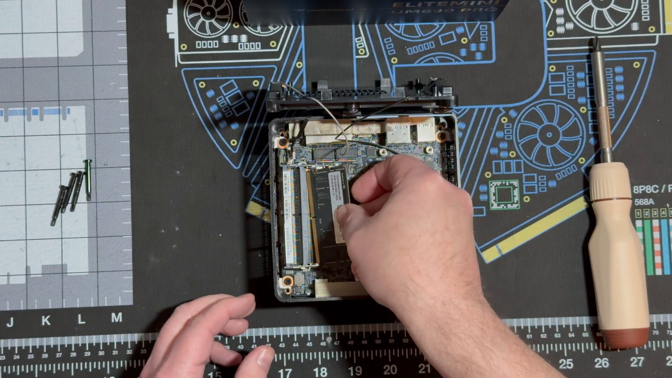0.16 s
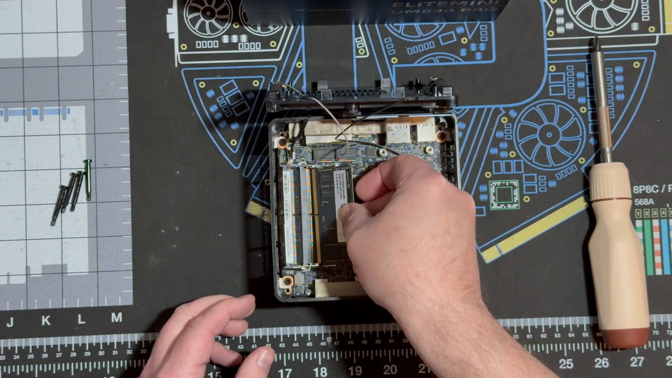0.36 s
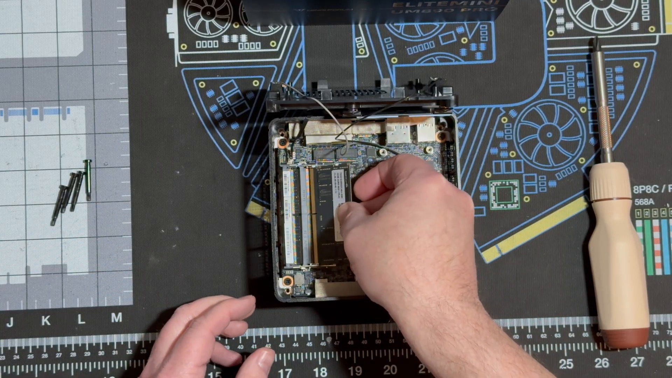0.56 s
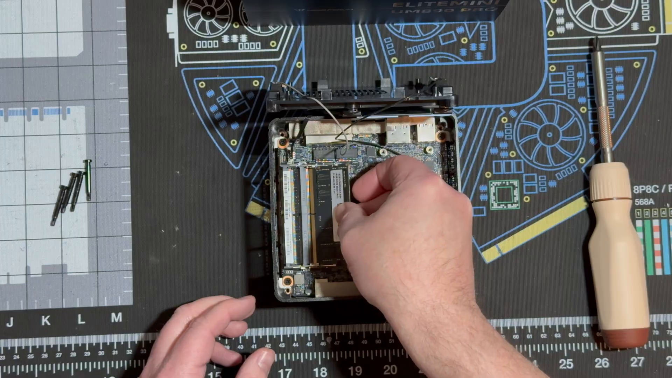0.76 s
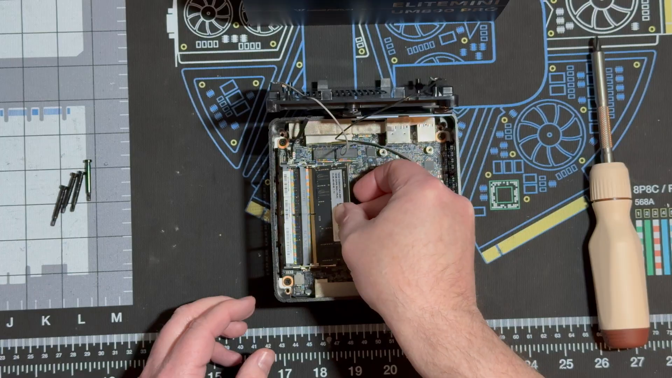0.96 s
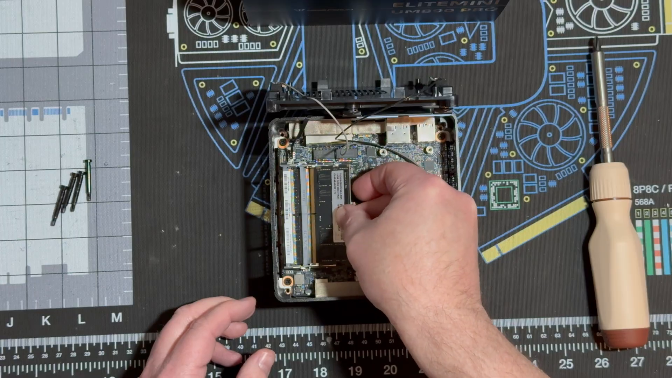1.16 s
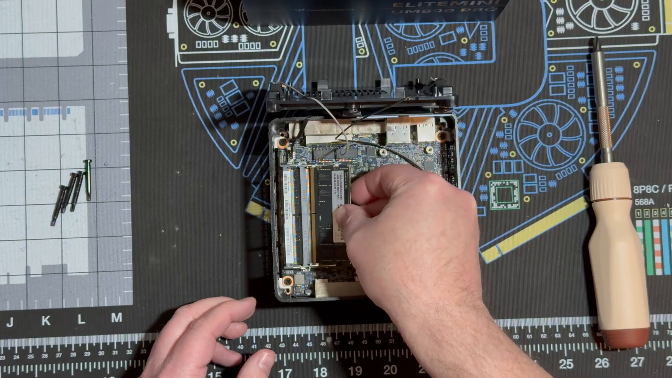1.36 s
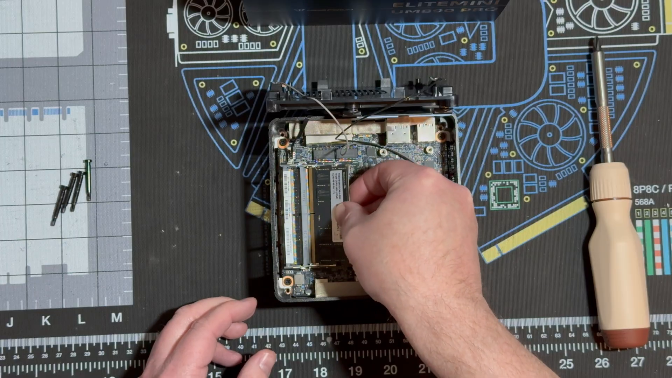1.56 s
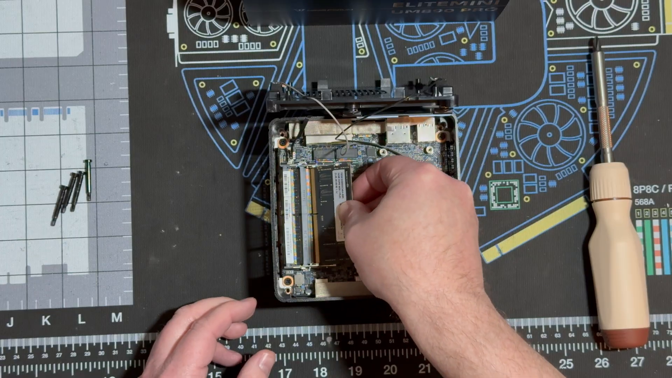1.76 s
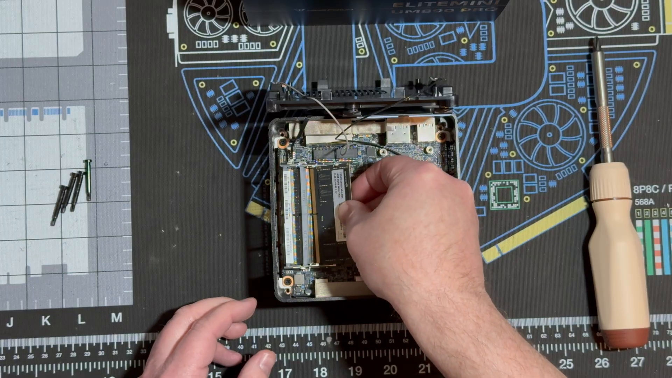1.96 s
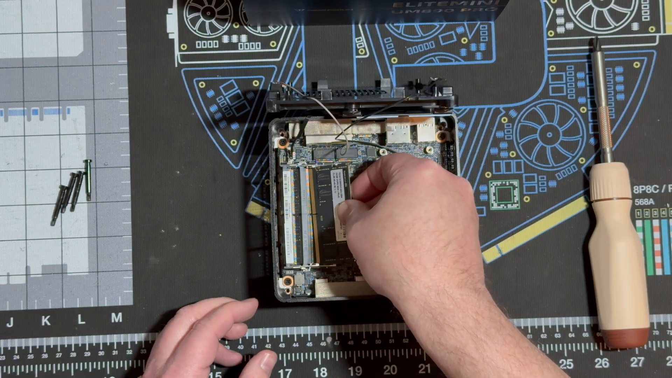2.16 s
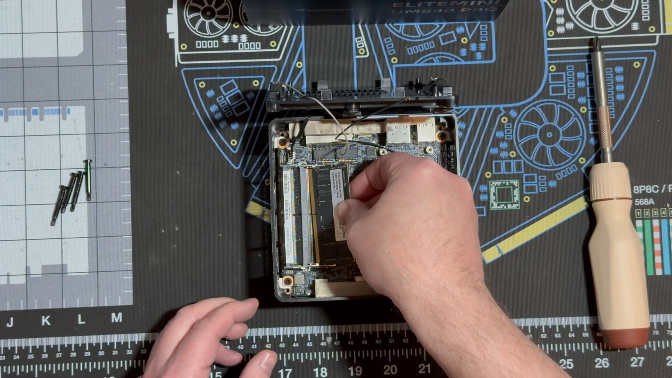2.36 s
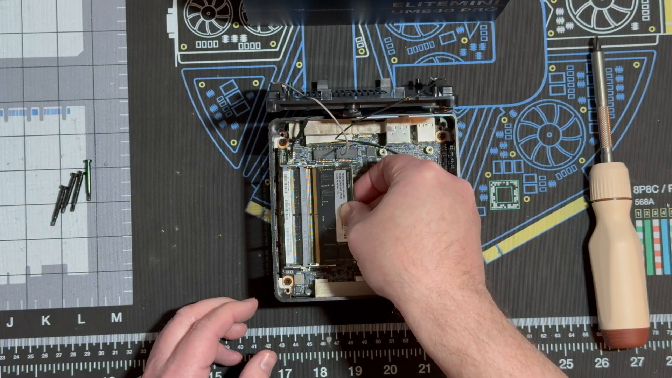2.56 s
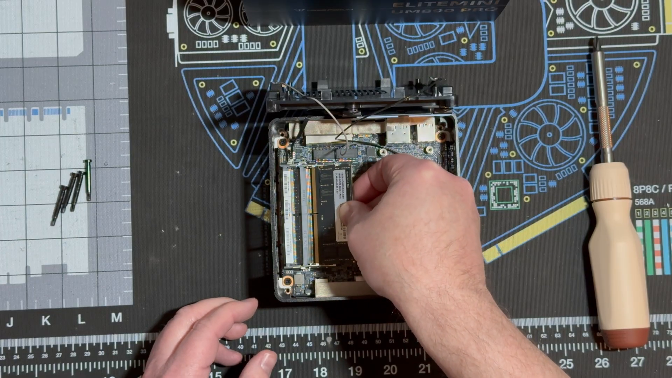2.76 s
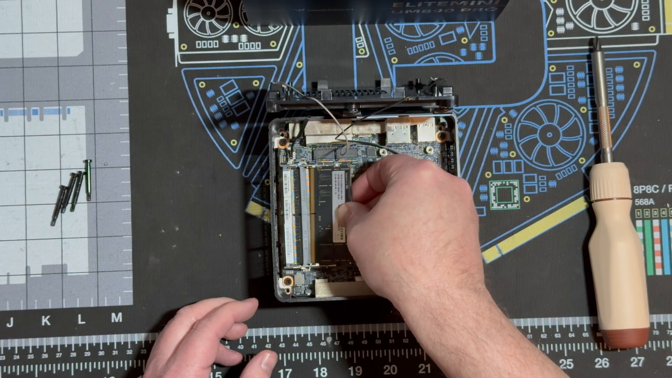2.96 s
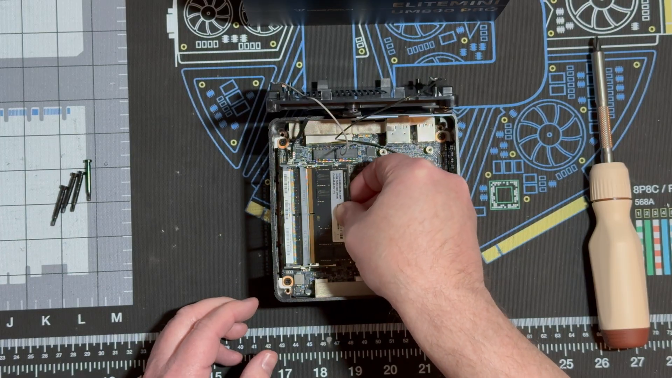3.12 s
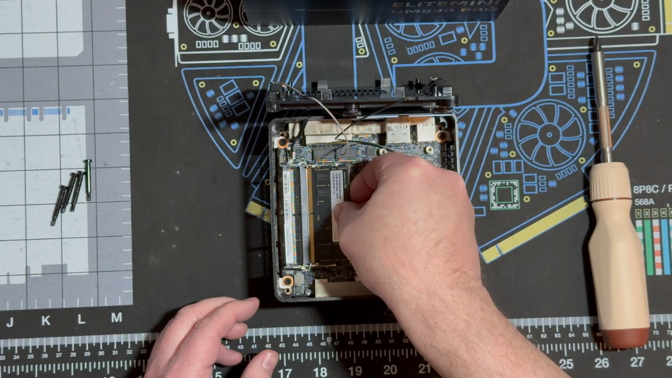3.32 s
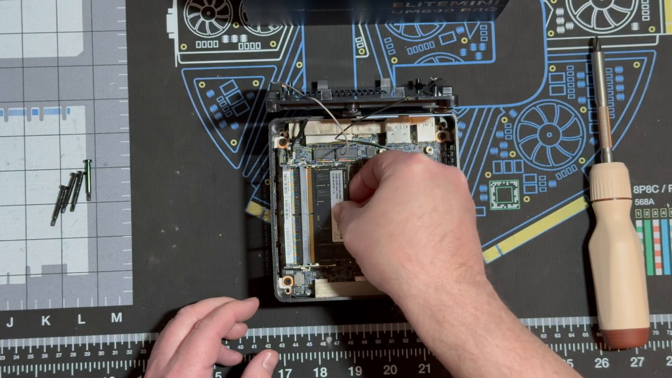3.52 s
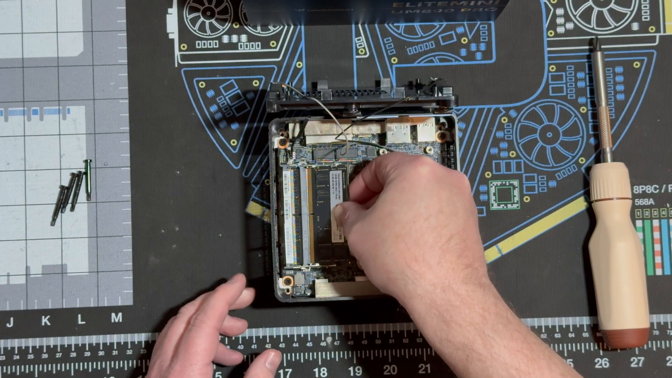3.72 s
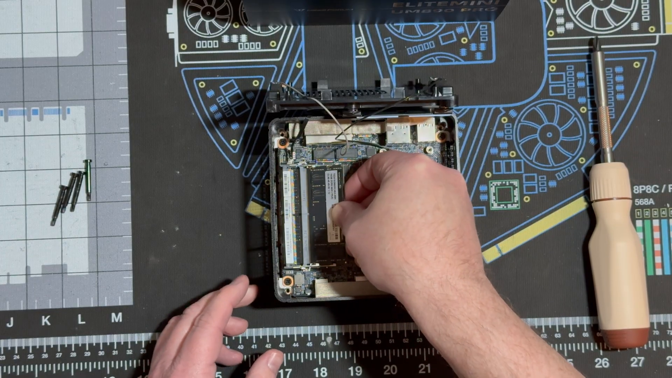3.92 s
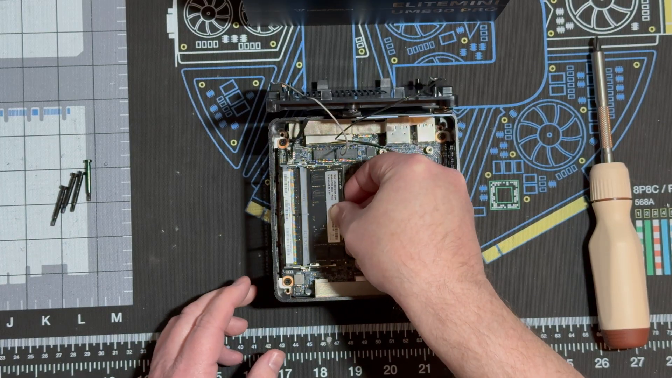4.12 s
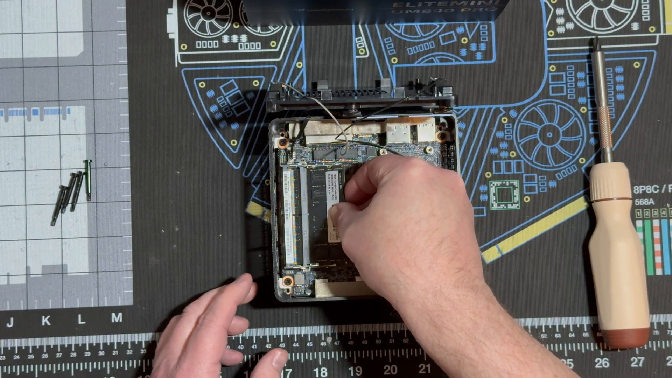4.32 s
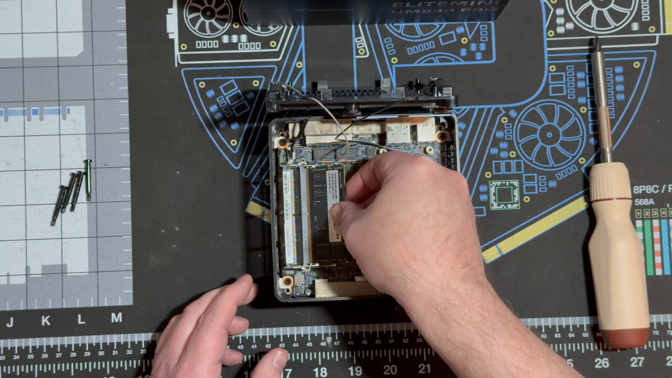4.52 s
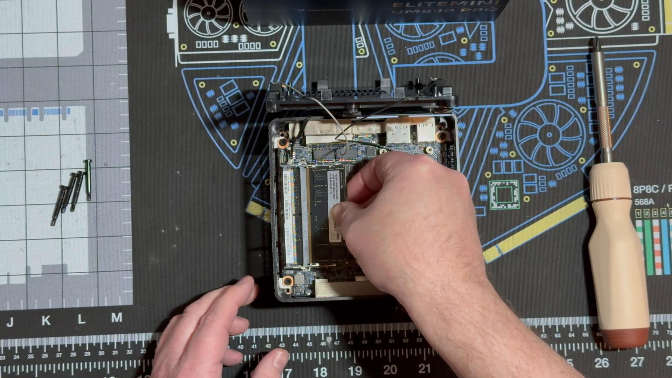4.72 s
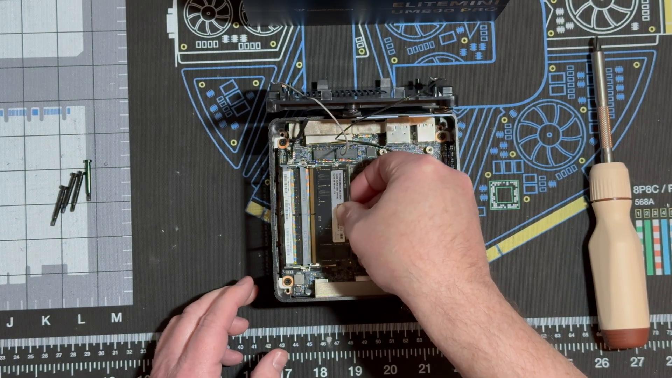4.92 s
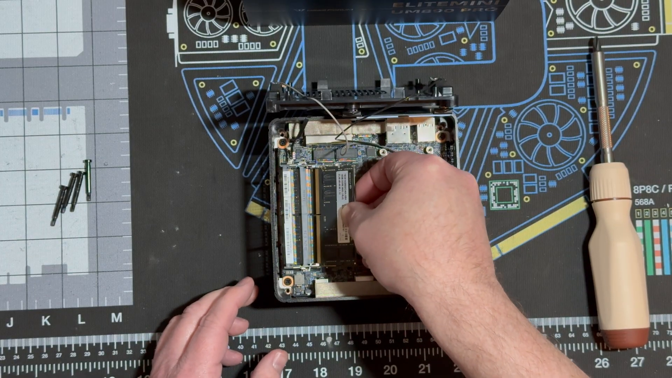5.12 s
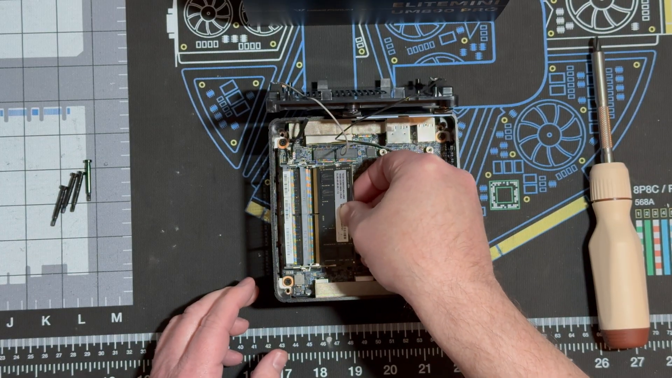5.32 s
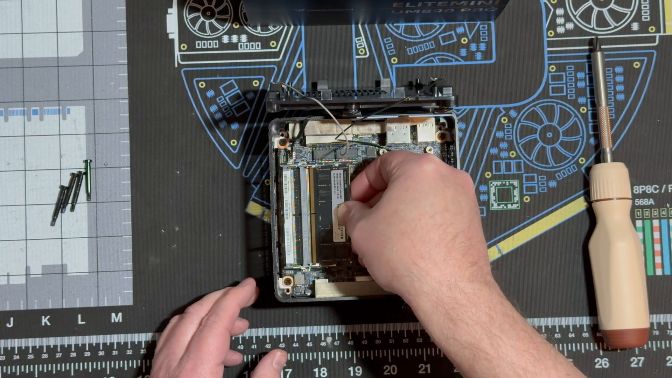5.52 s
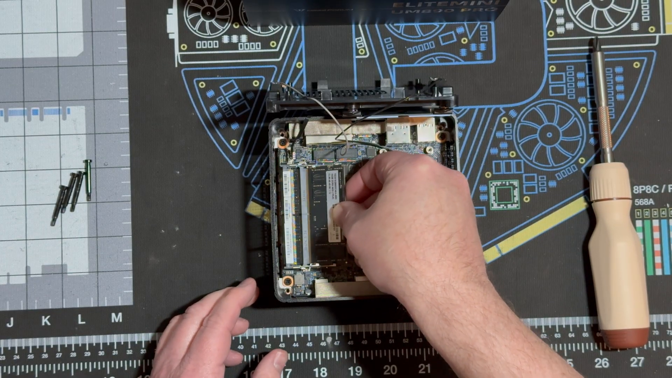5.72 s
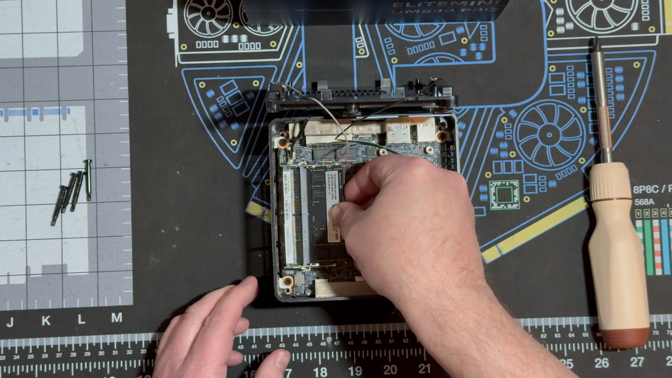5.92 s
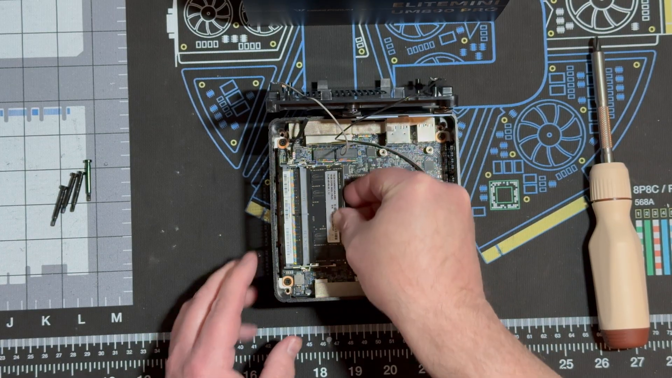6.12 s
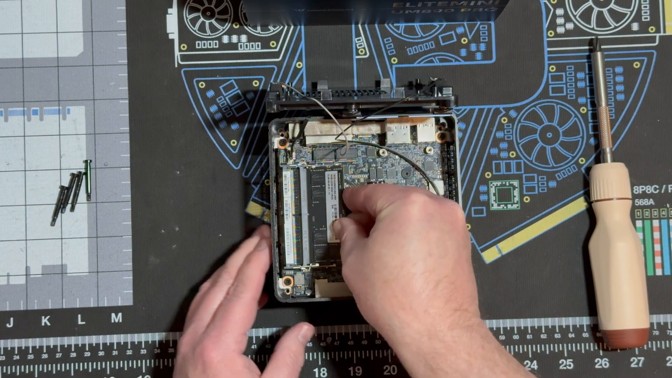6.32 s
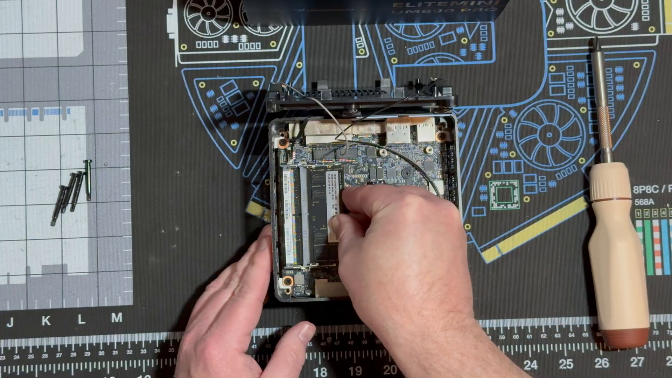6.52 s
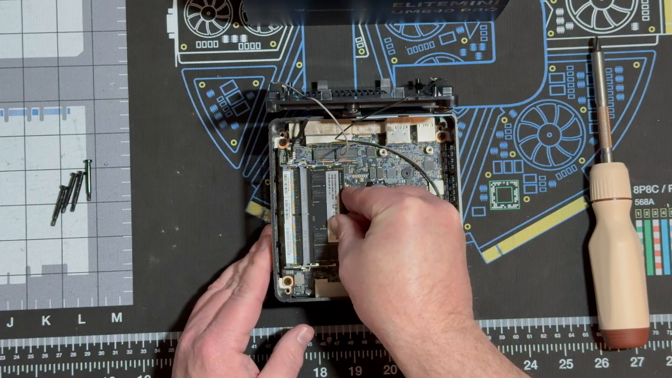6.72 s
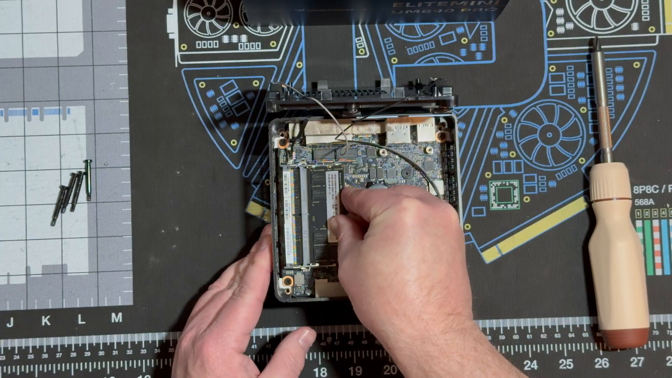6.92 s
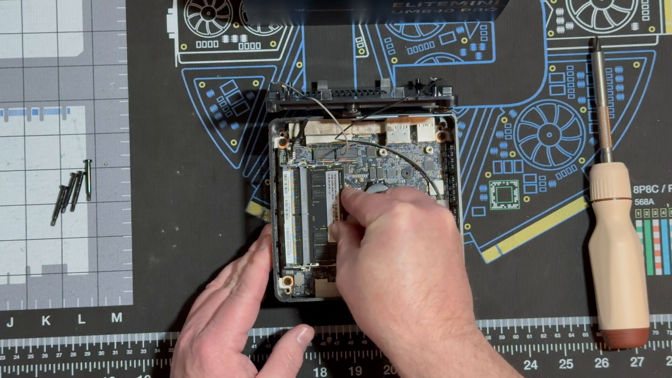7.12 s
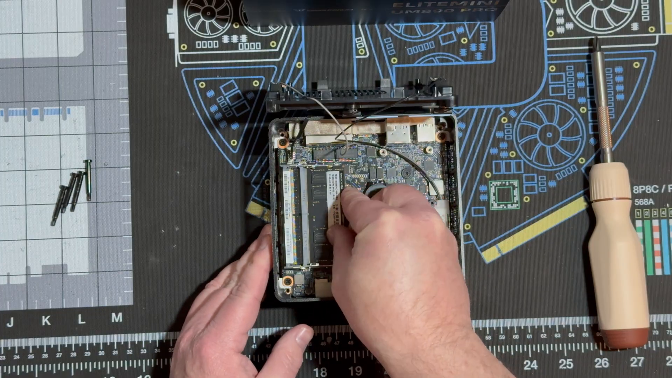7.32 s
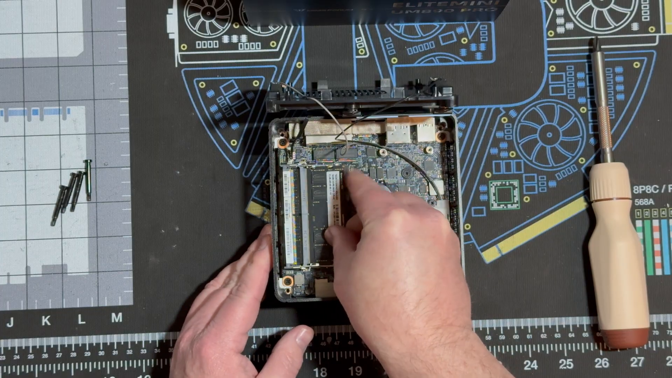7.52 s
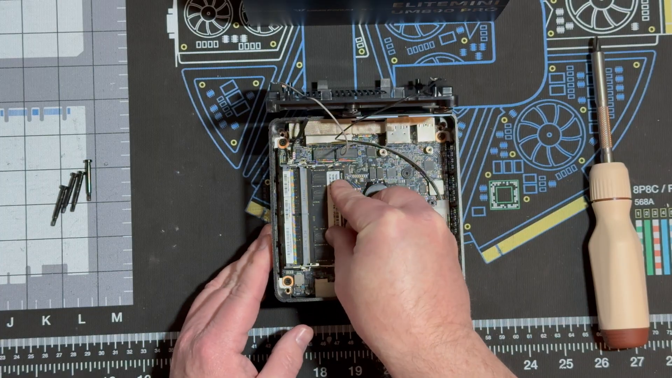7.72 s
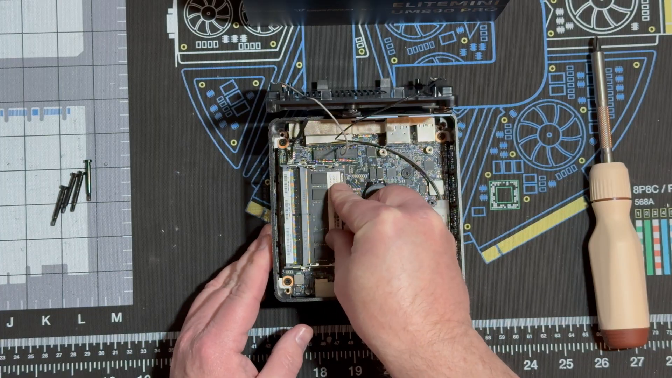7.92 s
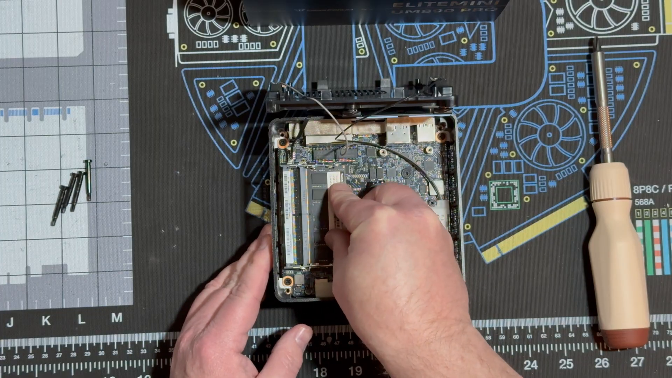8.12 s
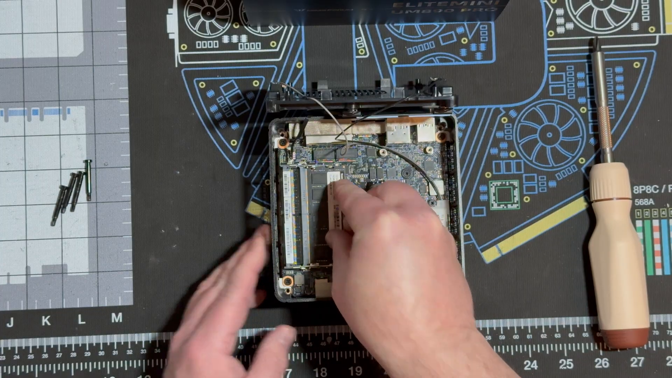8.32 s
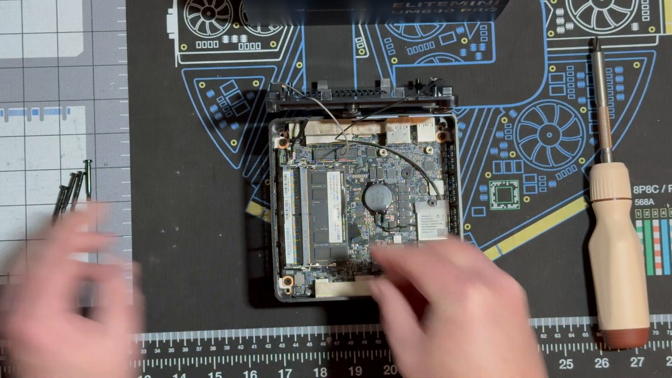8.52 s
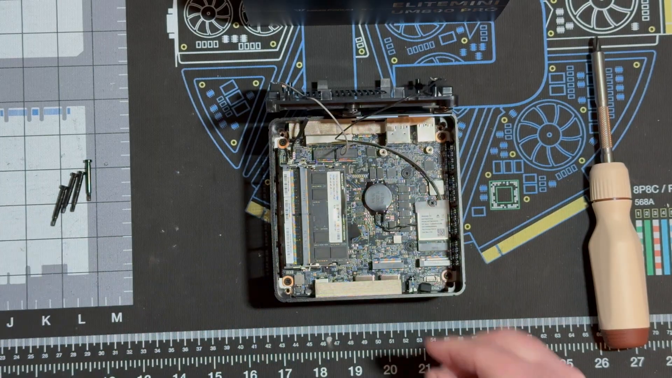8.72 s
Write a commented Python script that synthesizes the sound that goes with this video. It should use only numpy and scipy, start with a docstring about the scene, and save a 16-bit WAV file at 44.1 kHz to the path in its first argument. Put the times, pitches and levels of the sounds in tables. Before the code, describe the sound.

Close up on a desk in a quiet room, a memory module taps, ticks and scrapes against a computer slot in uneven little clusters. Soft low bumps carry through the desk to the microphone as it is pushed. After several seconds of fiddling it snaps home with a crisp crack, the loudest sound, and the metal clips ring briefly before a few last light clicks.

```python
"""A memory module taps and scrapes its way into the socket of a small computer board, then snaps home.
Each contact rings the board's resonances; metal contacts tick and the spring clips ring on.
The board lies on a desk mat, close under the microphone of a camera on an arm: taps thud through
the desk, and pushes set the arm swaying at a few very low tones.
Farther off, the walls answer briefly and the room hums quietly."""
import sys
import numpy as np
from scipy import signal
from scipy.fft import rfft, irfft, next_fast_len
from scipy.io import wavfile
from scipy.ndimage import map_coordinates

SR = 44100
rng = np.random.default_rng(int(sys.argv[2]) if len(sys.argv) > 2 else 0)


def generate_wav(signal):
    """Clip the signal to [-1, 1] and save it as 16-bit WAV at the path in sys.argv[1]."""
    frames = np.transpose(np.atleast_2d(signal))
    scaled = np.clip(frames, -1, 1) * 32767
    pcm = np.round(scaled).astype(np.int16)
    wavfile.write(sys.argv[1], SR, pcm)


N = 386757
FREQS = np.fft.rfftfreq(8192, 1 / SR)  # Hz, the grid for resonance curves


def amp(db):
    return 10 ** (np.asarray(db) / 20)


def unit_rms(x):
    return x / np.sqrt(np.mean(x ** 2) + 1e-20)


def along(points, hz):
    """Interpolates (Hz, value) points on a log frequency axis."""
    f, values = np.transpose(points)
    return np.interp(np.log(hz + 1), np.log(f + 1), values)


def curves(rows):
    """One value per sample for each column after the time."""
    times, *columns = np.transpose(rows)
    return [np.interp(np.arange(N) / SR, times, column) for column in columns]


def wobble(rate):
    """A smooth random curve, rate knots a second."""
    return map_coordinates(rng.standard_normal(int(N * rate / SR) + 4), [np.arange(N) * rate / SR])


def wavering(hz, waver_hz):
    """A tone of rms 1 whose pitch drifts."""
    phase = 2 * np.pi * np.cumsum(hz + waver_hz * wobble(2.5)) / SR
    return np.sqrt(2) * np.sin(phase + rng.uniform(0, 2 * np.pi))


def filtered(x, response):
    """Shapes x by a gain given as a function of frequency."""
    size = next_fast_len(N + SR // 2)
    return irfft(rfft(x, size) * response(np.fft.rfftfreq(size, 1 / SR)), size)[..., :N]


def add(track, start, sound):
    """Mixes a sound into the track at start seconds."""
    part = track[round(start * SR):][:len(sound)]
    part += sound[:len(part)]


def peaks(modes, f):
    """Magnitude of resonances (Hz, width in Hz, dB) added in power."""
    centre, width, db = np.transpose(modes)[:, :, None]
    power = amp(2 * db) * (f * width) ** 2 / ((centre ** 2 - f ** 2) ** 2 + (f * width) ** 2)
    return np.sqrt(power.sum(axis=0))


def contact(gain, rise, t60, ragged_db, blow=0.0038):
    """A ragged burst of micro-impacts rings a resonance curve; its energy is that of 2 ms at rms 1."""
    size = 2 * (len(gain) - 1)
    t = np.arange(size // 2) / SR
    lumps = np.repeat(rng.standard_normal(size // 64), 32)
    envelope = amp(ragged_db * lumps - 60 * t / t60) * (1 - np.exp(-t / max(rise, 1e-4)))
    burst = rng.standard_normal(len(t)) * envelope
    burst[round(rise * SR)] += blow / max(rise, 3e-4)  # a hard first blow stands out, a soft one sinks in
    cepstrum = irfft(np.log(gain + 1e-6))  # minimum phase: nothing rings before it is hit
    cepstrum[1:size // 2] *= 2
    cepstrum[size // 2 + 1:] = 0
    sound = irfft(rfft(burst, size) * np.exp(rfft(cepstrum)))
    return sound / np.linalg.norm(sound) * np.sqrt(.002 * SR)


# The room's steady noise, all around the microphone. Each row: frequency in Hz, relative level in dB.
ROOM_SPECTRUM = [(29, -28), (50, -5), (77, -26.5), (109, -17.5), (129, -18), (152, -27), (317, -29),
                 (498, -33.5), (561, -37), (616, -37), (727, -35.5), (1090, -39.5), (2680, -47),
                 (4730, -47.5), (14400, -51.5)]
# Its low murmur. Each row: time in seconds, level of the 340 Hz band in dB, of the 117 Hz band in dB.
MURMUR_LEVELS = [(0.0, -61, -73), (0.14, -66.5, -70), (0.49, -65.5, -70.5), (1.25, -67.5, -66.5),
                 (1.71, -68.5, -74), (2.12, -72.5, -75.5), (2.37, -75, -66), (2.54, -69, -63.5),
                 (2.83, -65.5, -67), (3.2, -69.5, -70.5), (3.79, -71, -67), (4.13, -74, -73),
                 (4.62, -72, -77), (5.06, -74, -76), (5.74, -64, -78), (6.03, -70.5, -72),
                 (7.16, -69.5, -74), (7.42, -69.5, -75), (7.64, -73, -72), (7.86, -80, -71),
                 (8.21, -81, -77), (8.4, -77.5, -78), (8.62, -67.5, -74), (8.77, -65.5, -73)]
# Appliances in the background. Each row: pitch in Hz, level in dB, pitch waver in Hz.
HUMS = [(123.3, -80, 2.4), (319, -81, 5), (518, -83, 2.4), (598.5, -81, 3.35)]


def room_tone():
    """The room behind the desk: hiss and rumble, two slowly swelling murmurs and faint appliance hums."""
    hiss, *noises = rng.standard_normal((3, N))
    bed = filtered(hiss, lambda f: amp(along(ROOM_SPECTRUM, f)) / (1 + (f / 14500) ** 40) * (f > 50))
    bands = [(340, 230, 0), (117, 31, 0)]
    murmur = sum(amp(db) * unit_rms(filtered(noise, lambda f: peaks([band], f) ** 2))
                 for noise, band, db in zip(noises, bands, curves(MURMUR_LEVELS)))
    hums = sum(amp(db + 3.5 * wobble(9)) * wavering(hz, waver_hz) for hz, db, waver_hz in HUMS)
    return amp(-65.5) * unit_rms(bed) + murmur + hums


# The room's decay, heard from the desk. Each row: frequency in Hz, t60 of the main tail in seconds.
WALL_DECAY = [(300, 0.32), (2000, 0.18), (6000, 0.13), (14000, 0.083)]


def walls(x):
    """The walls answer, with a weak longer tail from farther off, drawn anew every quarter second."""
    out, step = np.zeros(N), SR // 4
    for start in range(0, N, step):
        hz, t, noise = signal.stft(rng.standard_normal(SR // 2), SR, nperseg=256)
        fall_db = -60 * t / along(WALL_DECAY, hz)[:, None]
        near, far = amp(fall_db), amp(-16.5 + 0.22 * fall_db)
        _, tail = signal.istft(noise * (near + far), SR, nperseg=256)
        echo = signal.fftconvolve(x[start:start + step], tail / np.linalg.norm(tail))
        add(out, start / SR + 0.005, echo)
    return out


# The arm that holds the microphone. Each entry: pitch in Hz of the slow, main, upper and top tone.
ARM_HZ = [16, 30.5, 46, 68]
# The arm between pushes. Each entry: level in dB of one of those tones.
ARM_REST_DB = [-66, -70.5, -70.5, -75]
# Pushes that reach the microphone through the arm. Each row: start in seconds, rise in seconds,
# main sway in dB, its t60 in seconds, jolt of the upper tone in dB.
PUSHES = [(.02, .05, -62, 0.37, -71), (.2, 0.41, -42.5, 1.1, -63), (.82, 0.11, -50, 1.8, -49.5),
          (1.13, 0.12, -53.5, 1.1, -56), (1.35, 0.16, -52, 1.7, -64), (2.33, 0.18, -50.5, 1.6, -62),
          (2.52, 0.15, -50, 2, -49.5), (2.91, 0.095, -42.5, 1.3, -41), (3.27, .17, -47.5, 0.77, -69),
          (3.74, 0.28, -39.5, 0.58, -46), (4.11, 0.052, -44, 0.46, -68), (4.34, .13, -47.5, 0.79, -56.5),
          (4.67, .05, -60, 1.8, -62), (5.1, 0.17, -54.5, 1.3, -66), (5.64, 0.13, -48.5, 12, -48),
          (6.22, 0.097, -53, 1.5, -54), (6.4, 0.15, -48, 6, -63), (6.66, 0.072, -52.5, 3.7, -55),
          (7.15, .06, -54.5, 0.79, -59), (7.3, 0.048, -49, 2.7, -65), (7.43, 0.051, -54, 2.3, -48.5),
          (7.6, 0.052, -51, .6, -65), (7.83, 0.027, -28.5, 2, -35), (8.06, 0.068, -38, 7.3, -38.5)]


def arm_sway():
    """Each push swells the camera arm's two low tones and jolts the two higher ones."""
    t = np.arange(0, N / SR, .005)
    start, sway_rise, sway_db, sway_t60, jolt_db = np.transpose(PUSHES)[:, :, None]

    def swell(db, rise, t60):
        attack = np.clip((t - start) / rise, 0, 1)
        decay = amp(db - 60 * np.clip(t - start - rise, 0, None) / t60)
        level = np.linalg.norm(attack * decay, axis=0)  # pushes add in power
        return np.interp(np.arange(N) / SR, t, level)

    levels = [swell(sway_db - 5.5, sway_rise, 0.95 * sway_t60), swell(sway_db, sway_rise, sway_t60),
              swell(jolt_db, rise=0.033, t60=0.96), swell(jolt_db - 7.5, rise=0.033, t60=0.26)]
    return sum(np.hypot(level, amp(rest_db + 7 * wobble(6.5))) * wavering(hz, waver_hz=0.0254 * hz)
               for hz, level, rest_db in zip(ARM_HZ, levels, ARM_REST_DB))


def arm_kick(hz=46.1, db=-20, t60=.3):
    """The snap throws the camera arm into a few hard swings."""
    t = np.arange(SR // 2) / SR
    return amp(db - 60 * t / t60) * np.sin(2 * np.pi * hz * t) * (1 - np.exp(-t / 0.0069))


# The desk under the board. Each row: pitch in Hz, relative level in dB, t60 in seconds.
DESK_MODES = [(63.4, -1, 0.48), (82, -9.5, .25), (116.4, 2, 0.16), (153.5, -2.5, 0.15),
              (193.4, -11.5, 0.44), (221, -23.5, .15)]


def desk_thud():
    """A knock rings the desk's low modes as damped sines."""
    t = np.arange(SR // 2) / SR
    hz, db, t60 = np.transpose(DESK_MODES)[:, :, None]
    modes = amp(db - 60 * t / t60) * np.sin(2 * np.pi * hz * t)
    return modes.sum(axis=0) * (1 - np.exp(-t / 0.0023))


# Board and module, close under the microphone; rubbing, scrapes and taps all ring them.
# Each row: centre in Hz, base width in Hz, relative level in dB.
BOARD_MODES = [(339, 100, -10.5), (515, 66, -9), (768, 63, -3), (877, 61, -5.5), (928, 21, -5.5),
               (1085, 29, -3), (1386, 19, 0), (1562, 99, -3.5), (1899, 61, -2), (2128, 67, -3.5),
               (2457, 97, -9.5), (2630, 190, -9), (3354, 400, -8.5), (3434, 62, -7.5), (3987, 110, -10),
               (4170, 110, -12.5), (4690, 86, -8), (5100, 750, -13.5), (6360, 480, -13), (8770, 840, -34.5),
               (9730, 960, -14), (12300, 1500, -28), (14300, 1800, -27)]
# Module and fingers sliding on the board. Each row: time in seconds, level in dB before the treble cut.
RUB_LEVELS = [(0.0, -72.5), (0.44, -74), (0.63, -77), (1.25, -67.5), (1.81, -83), (2.39, -82),
              (2.54, -64.5), (2.69, -83), (3.45, -79.5), (3.81, -72), (4.13, -77), (5.67, -73), (6.01, -78),
              (6.15, -70.5), (6.67, -81.5), (7.13, -78), (7.84, -81.5), (7.96, -86.5), (8.25, -77),
              (8.77, -77.5)]


def rubbing(treble_db=-7):
    """Uneven grains of friction drive the board's resonances."""
    rub_db, = curves(RUB_LEVELS)
    grains = rng.standard_normal(N) * amp(1.5 * wobble(40) + 3 * wobble(500))
    sound = unit_rms(filtered(grains, lambda f: peaks(np.multiply(BOARD_MODES, [1, 1.5, 1]), f)))
    treble = filtered(sound, lambda f: 1 / (1 + (3000 / (f + 1)) ** 4))
    return amp(rub_db) * (sound - treble + amp(treble_db) * treble)


# Short scrapes along the socket. Each row: start in seconds, length in seconds, level in dB,
# first colour in Hz, last colour in Hz.
SCRAPES = [(0, 0.065, -67, 1860, 1810), (0.152, 0.064, -67, 1880, 1300), (0.27, 0.044, -60, 1100, 1400),
           (0.299, 0.079, -71, 1100, 1900), (.43, .07, -71, 1400, 2400), (0.821, 0.086, -68.5, 1400, 1900),
           (0.959, 0.065, -69, 3400, 1990), (2.033, 0.13, -71, 1830, 1870),
           (2.345, 0.086, -71.5, 4000, 2960), (2.453, 0.034, -64, 1760, 1780),
           (2.866, 0.13, -63.5, 2440, 2180), (4.309, 0.066, -70.5, 3270, 3420),
           (4.374, 0.039, -62.5, 2500, 2800), (4.413, 0.15, -66.5, 2140, 1870),
           (4.616, 0.062, -71, 2340, 2300), (4.766, 0.043, -77, 1500, 1400),
           (5.365, 0.099, -75, 1900, 1900), (5.638, 0.11, -57.5, 2050, 1300),
           (5.691, 0.066, -63, 2000, 1000), (5.946, 0.09, -71.5, 3000, 2000),
           (6.017, 0.12, -66, 5070, 3000), (6.153, 0.059, -71, 3700, 2880), (6.186, 0.053, -65, 2550, 1460),
           (6.919, 0.031, -76, 4000, 3800), (7.01, 0.14, -69, 2730, 2960),
           (7.132, 0.031, -51.5, 2870, 3370), (7.239, .029, -71, 3000, 3020),
           (7.524, 0.072, -73.5, 3300, 3270), (7.808, 0.023, -32.5, 3300, 2000),
           (8.186, 0.03, -72.5, 2490, 3010)]


def scrapes():
    """Gritty friction through the board; one colour fades into another as the contact point moves."""
    out = np.zeros(N)
    board = peaks(np.multiply(BOARD_MODES, [1, 1.1, 1]), FREQS) ** 0.99
    for start, length, db, first_hz, last_hz in SCRAPES:
        progress = np.linspace(0, 1, round(length * SR))
        grit = rfft(rng.standard_normal(8192) * amp(3 * np.repeat(rng.standard_normal(128), 64)))
        colours = [peaks([(hz, 0.25 * hz, 0)], FREQS) ** 0.66 for hz in (first_hz, last_hz)]
        first, last = (unit_rms(irfft(grit * board * colour))[:len(progress)] for colour in colours)
        envelope = amp(db) * np.sin(np.pi * progress ** 0.59)
        add(out, start, envelope * ((1 - progress) * first + progress * last))
    return out


# The socket's spring clips, left ringing. Each row: start in seconds, pitch in Hz, level in dB,
# t60 in seconds.
CLIP_RINGS = [(.29, 3100, -70, .2), (0.405, 3200, -65.5, 0.35), (.405, 4040, -65, .25),
              (.53, 3220, -68, .25), (2.525, 3200, -48, 0.12), (2.55, 3190, -47.5, 0.17),
              (2.67, 3220, -77, 0.43), (3.655, 3550, -54, 0.23), (3.655, 957, -51, 0.25),
              (7.829, 5240, -52, 0.37), (7.83, 9800, -60, .2), (8.066, 4170, -58, 0.22),
              (8.068, 4670, -68, 0.3), (8.14, 3360, -70, 0.18), (8.244, 5250, -65.5, .06)]


def spring_clips(rise_s=0.0064, flutter_hz=37, waver_share=.006):
    """Spring clips swell into a thin ring that flutters in level and wavers in pitch."""
    out, t = np.zeros(N), np.arange(SR // 2) / SR
    for start, hz, db, t60 in CLIP_RINGS:
        waver_hz = waver_share * hz * np.interp(t, np.linspace(0, .5, 30), rng.standard_normal(30))
        tone = np.sin(2 * np.pi * (hz * t + np.cumsum(waver_hz) / SR))
        flutter = amp(2.3 * np.sin(2 * np.pi * flutter_hz * t + rng.uniform(0, 2 * np.pi)))
        envelope = amp(db - 60 * t / t60) * (1 - np.exp(-t / rise_s))
        add(out, start, flutter * envelope * tone)
    return out


# Metal contacts inside the socket. Each row: start in seconds, relative level in dB, centre in Hz,
# t60 in seconds, bite at 3-6 kHz in dB.
METAL_TICKS = [(1.3788, -46, 9100, .004, -32), (1.3842, -19.5, 9900, 0.02, -50),
               (4.496, -46.5, 8700, 0.023, -13), (7.013, -42, 13100, 0.014, -32),
               (7.381, -36, 11700, 0.016, -5.5), (8.245, -28, 13270, 0.028, -13)]


def metal_ticks(rebound_s=0.0088, rebound_db=-14.5):
    """Tiny contacts ring two broad high resonances, with some bite from the board, and rebound twice."""
    out, f = np.zeros(N), np.fft.rfftfreq(2048, 1 / SR)
    for start, db, hz, t60, bite_db in METAL_TICKS:
        metal = peaks([(hz, 0.26 * hz, 0), (1.28 * hz, 0.26 * hz, -7)], f) ** 2
        highpass = 1 / (1 + (0.61 * hz / (f + 1)) ** 6)
        bite = amp(bite_db) * peaks([(3300, 300, 0.5), (5280, 400, 2.5), (6400, 970, -3)], f)
        for lag, loss_db in [(0, 0), (rebound_s, rebound_db), (2 * rebound_s, 1.7 * rebound_db)]:
            tick = contact(metal * highpass + bite, 0.00011, t60, ragged_db=5.5, blow=0.005)
            add(out, start + lag, amp(db + loss_db - 11.5) * tick)
    return out


# The module's edge against the socket, close to the microphone. Each row: start in seconds, relative
# level in dB, pitch of the spot hit in Hz, colour in dB at 1 kHz, at 4 kHz and in the treble,
# hardness in dB (a harder tap rises faster and chatters less long).
TAPS = [(.151,-50.5,1900,-1,-21,-4,4), (.191,-45,1610,1,-17,-6,-4), (.207,-59,1600,0,-14,-5,0),
        (0.224,-52,1120,2,-1,3,-1), (.272,-46.5,1110,4,-4,3,-2), (.284,-48,1090,8,-6,1,3),
        (0.367,-37,1900,1.5,1.5,-6.5,0), (.389,-39.5,1790,1,-3,-3,3), (.405,-37,3870,5,10.5,8.5,1),
        (.465,-49,2400,-7,0,-6,0), (0.527,-37,5430,9,19,13,3.5), (.602,-40.5,1090,3.5,-9,2,2.5),
        (.649,-49.5,907,4,-17,-9,2), (.787,-48.5,1880,7,1,1,-4), (.805,-32,2050,0.5,-11,-17.5,-1.5),
        (1.104,-40,1570,-1,-8,5,7), (1.1133,-22,1090,-4,-2,-7.5,0), (1.123,-31.5,2240,10,-8,-12,4),
        (1.155,-37.5,5300,10,11,12,2), (1.346,-46.5,2120,11,7,15,-2), (1.64,-46.5,3460,-3,-6,0,-6),
        (1.664,-31.5,3300,1,-1,-3,-5), (1.669,-22,2070,5.5,1.5,-0.5,3.5), (1.719,-41.5,902,-3,0,2,3),
        (1.758,-45.5,1880,1,-6,-11,6), (1.832,-34,1750,7,2.5,1.5,-6.5), (1.848,-41,1700,2,-12,0,2),
        (2.156,-52.5,1390,7,-25,-11.5,7), (2.365,-49.5,4060,6,-2,6.5,1),
        (2.463,-38.5,1570,-5.5,-30,-9,-0.5), (2.52,-38.5,2320,2,-1,2,-3), (2.523,-26,2380,4,1.5,4.5,0.5),
        (2.897,-41,1890,3,-8,-2,-5), (2.916,-28.5,1920,1,-0.5,-4,10), (2.9254,-43,2000,4,-13,-12,-3),
        (3.6494,-24,2140,0.5,-3,-8,5), (3.65,-28.5,4800,-17,7,-15,8.5), (3.777,-42,2250,0,4,-5,-1),
        (3.78,-27.5,2360,0.5,-0.5,-12,6), (3.798,-32.5,2160,4,-2,-5,2.5), (3.892,-34,2050,-4.5,-20,-21,-1),
        (4.039,-52.5,3980,-6,3,-8,0), (4.064,-44.5,2550,-1,4,-20,1.5), (4.417,-46.5,2200,4,0,-4,-5),
        (4.782,-58,2600,-2,-10,-15,3), (4.83,-43.5,715,7,-0.5,-2,0), (4.937,-56,2700,5,-5,9,7),
        (5.149,-52.5,1560,0,-10,-7,4), (5.183,-46,1510,-1,-22,-16,1), (5.213,-42.5,1680,1.5,-1,0,5),
        (5.47,-56,3860,-3,4,4,12.5), (5.505,-44.5,1720,4.5,-4,0,-1), (5.6295,-38,4800,-7,-3,-23,12.5),
        (5.633,-33.5,1450,-6,-14,-23,5.5), (5.653,-36,2050,0,-2,-6,0), (5.666,-37.5,950,13,-16,1,7),
        (5.672,-42,890,22,-14,-4,7), (5.686,-46,2750,2,-2,-6,13), (5.719,-37.5,2830,10,-4,-16,10.5),
        (6.031,-53,4550,12,0,12,0), (6.272,-48.5,1920,-6,5,-1,1), (6.318,-46.5,2110,12,5,3,-1),
        (6.529,-54.5,1060,-1,3,-11,1), (6.594,-47,3000,-3,3,-10,3), (7,-50,3400,0,-2,-8,9),
        (7.093,-40.5,2880,0,5,-8,12), (7.14,-43,4050,-17,12,4,-2), (7.43,-33.5,2990,4.5,2.5,-16,11.5),
        (7.801,-46.5,3300,2,-7,-10,0), (7.811,-28.5,3400,-6,0,-1,6.5), (7.814,-24,1550,-4,-6,-4,-5),
        (7.8291,-30.5,1960,3.5,-7.5,4,1), (7.832,-37,2706,1,-7,12.5,0), (8.067,-38.5,3480,0,8,-2,-1),
        (8.073,-38.5,4600,3,8,-1,-1), (8.195,-52.5,2650,-5,1,0,2), (8.208,-56,1090,0.5,-7,4,5)]


def module_taps():
    """Each tap chatters through the board's resonances, favouring the spot hit, and thuds the desk."""
    direct, to_walls, desk = np.zeros((3, N))
    thud = desk_thud()
    lowpass = 1 / (1 + (FREQS / 6500) ** 4)
    bass_loss = 1 + (400 / (FREQS + 1)) ** 2  # a small board radiates little bass
    for start, db, spot_hz, low_db, mid_db, treble_db, hard_db in TAPS:
        rise = .0015 * amp(-0.4 * (db + 40.5) - hard_db)
        t60 = 0.044 * amp(0.02 * (db + 45.5) - 0.46 * hard_db)
        sheen_db = treble_db - 3.5 + 0.26 * (db + 38.5)
        tilt = [(1000, low_db), (2000, 0), (4000, mid_db), (6500, treble_db), (11000, sheen_db)]
        colour = amp(along(tilt, FREQS)) / bass_loss

        modes = np.array(BOARD_MODES, float)
        mode_hz, mode_width, mode_db = modes.T  # views into modes
        mode_hz *= 1 + 0.0089 * rng.standard_normal(len(modes))
        # A harder tap seats the module and widens the resonances.
        mode_width *= np.hypot(1, amp(2 * (db + 14.5) + 0.28 * hard_db))
        mode_db += 1.9 * rng.standard_normal(len(modes))
        # Toward the walls the resonances blur, summed over all directions.
        blurred = peaks(modes * [1, 2.1, 1], FREQS) * colour
        add(to_walls, start, amp(db - 6.5) * contact(blurred, 0.00016, 0.0041, ragged_db=1.5))

        # The spot hit lifts the modes near its pitch and adds a resonance of its own.
        mode_db += 7 * np.exp(-(np.log(mode_hz / spot_hz) / 0.1) ** 2)
        gain = peaks([*modes, (spot_hz, 0.06 * spot_hz, -0.5)], FREQS) ** 1.02 * colour
        body = contact(gain * lowpass, rise, t60, ragged_db=2.5, blow=0.0012)
        treble = contact(gain * (1 - lowpass), rise, t60, ragged_db=4.5, blow=0.0029)
        share = np.linalg.norm(gain * (1 - lowpass)) / np.linalg.norm(gain * lowpass)
        add(direct, start, amp(db - 7) * (body + share * treble) / np.hypot(1, share))
        add(desk, start + 0.00767, amp(db - 25.5) * thud)  # the thud climbs the arm and arrives late
    return direct, to_walls, desk


# The latches' resonances. Each row: centre in Hz, base width in Hz, relative level in dB.
LATCH_MODES = [(560, 220, -22), (1080, 265, -15.5), (1545, 136.3, -12), (2690, 150, -10.5), (2060, 230, -6),
               (3384, 330, -1), (4030, 230, -3.5), (4700, 250, -7.5), (5260, 300, -14), (5840, 270, -13),
               (9020, 570, -12), (10000, 500, -13), (11200, 780, -11.5), (13700, 1555, -15.5)]
# The latches snapping home, right under the microphone. Each row: start in seconds, relative level
# in dB, brightness in dB per octave.
SNAP_BLOWS = [(7.8205, -9.5, 0), (7.8224, -17, 0.5), (7.8235, -16.5, 1.5), (7.8268, -22.5, 2)]


def latch_snap():
    """The latches crack shut in a few quick blows, rattle briefly, thud the desk and kick the arm."""
    direct, to_walls = np.zeros((2, N))
    latch = peaks(LATCH_MODES, FREQS) ** 1.23
    for start, db, bright_db in SNAP_BLOWS:
        gain = latch * amp(bright_db * np.log2(FREQS / 3400 + .1))
        add(direct, start, amp(db - 7.5) * contact(gain, .0004, 0.0044, ragged_db=3.5, blow=.003))
    start, db, _ = SNAP_BLOWS[0]
    # The walls receive a blurred, brighter share of the first blow.
    blurred = peaks(np.multiply(LATCH_MODES, [1, 2.2, 1]), FREQS)
    brighter = amp(along([(1000, -2.5), (4000, -0.5), (5400, 5.5), (7500, 0), (16000, 5)], FREQS))
    add(to_walls, start, amp(db - 6) * contact(blurred * brighter, .0002, .002, ragged_db=0, blow=.01))
    rattle = contact(blurred, rise=0.0023, t60=0.027, ragged_db=2.5)
    add(direct, start + .003, amp(db - 17.5) * rattle)
    add(direct, start + .014, amp(db - 23.5) * desk_thud())
    add(direct, start + .0145, arm_kick())
    return direct, to_walls


def scene():
    """One microphone over the desk: the board close up, rumble through the arm, the room behind."""
    taps, taps_to_walls, thuds = module_taps()
    snap, snap_to_walls = latch_snap()
    ticks = metal_ticks()
    friction = scrapes() + rubbing()
    echoes = amp(-10) * walls(taps_to_walls + snap_to_walls + friction + amp(-1.5) * ticks)
    close = taps + snap + spring_clips() + ticks + friction
    return (close + echoes + thuds + arm_sway() + room_tone())[None]


def record(dry):
    """The camera's microphone channel keeps nothing above 16650 Hz."""
    return filtered(dry, lambda hz: np.clip((16650 - hz) / 500, 0, 1))


dry = scene()
out = record(dry)
generate_wav(out)
```